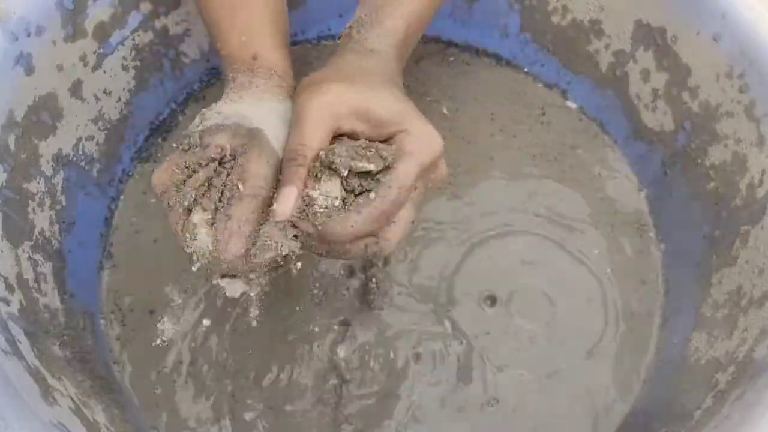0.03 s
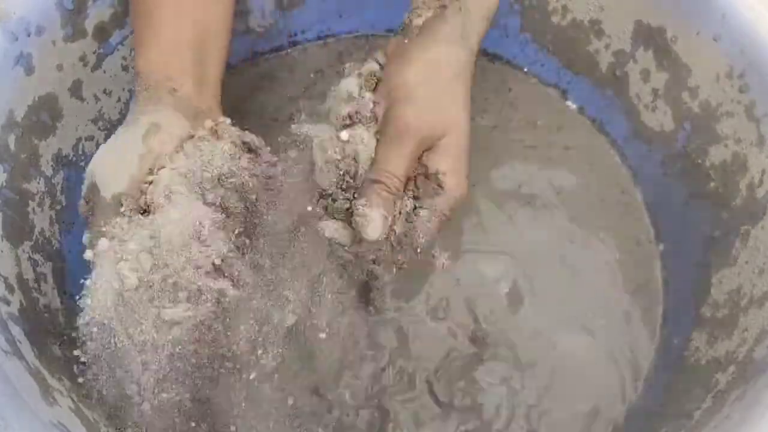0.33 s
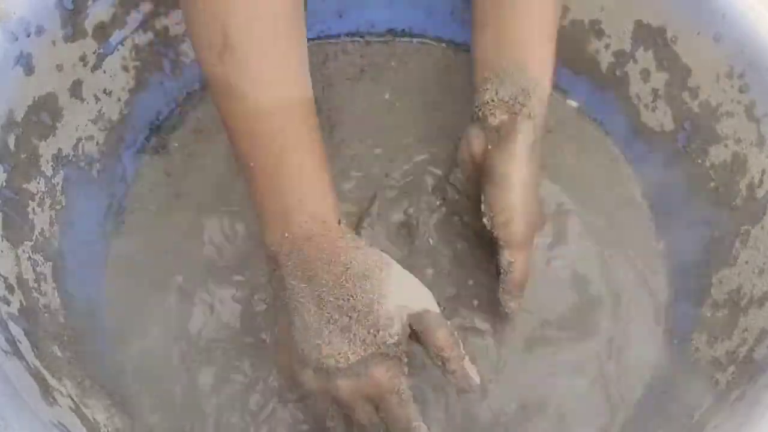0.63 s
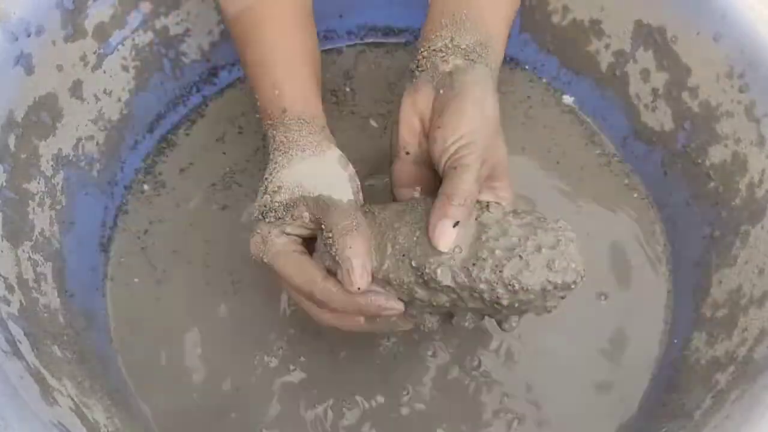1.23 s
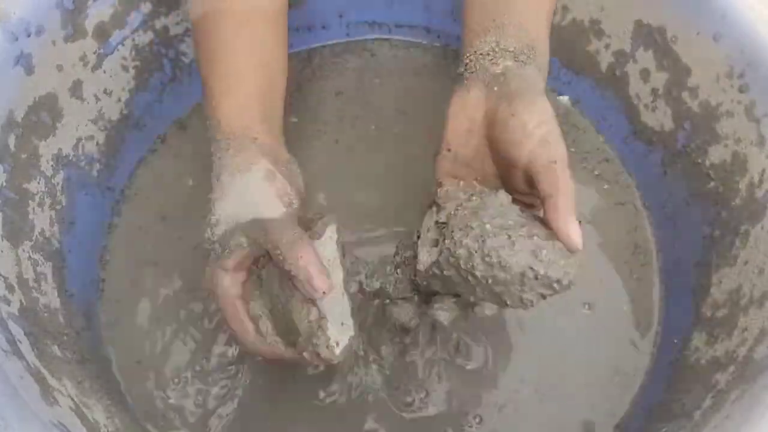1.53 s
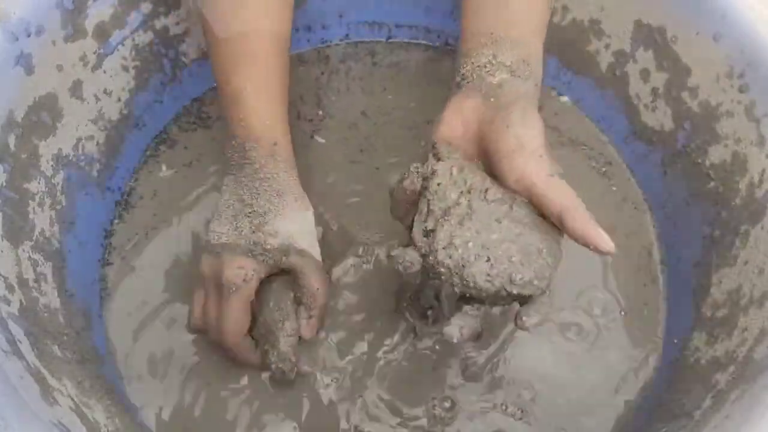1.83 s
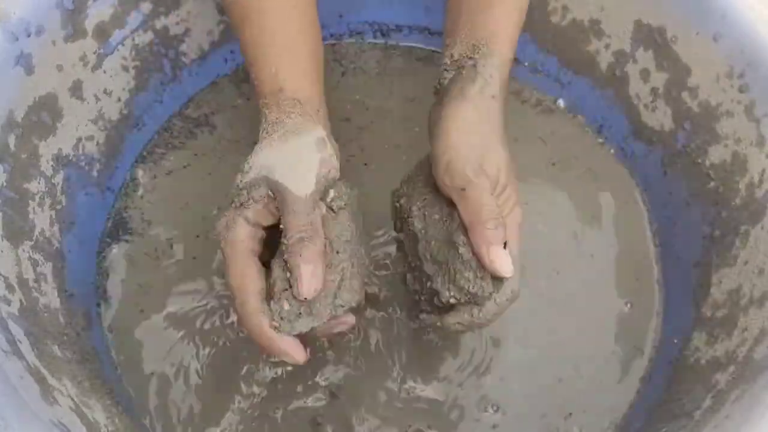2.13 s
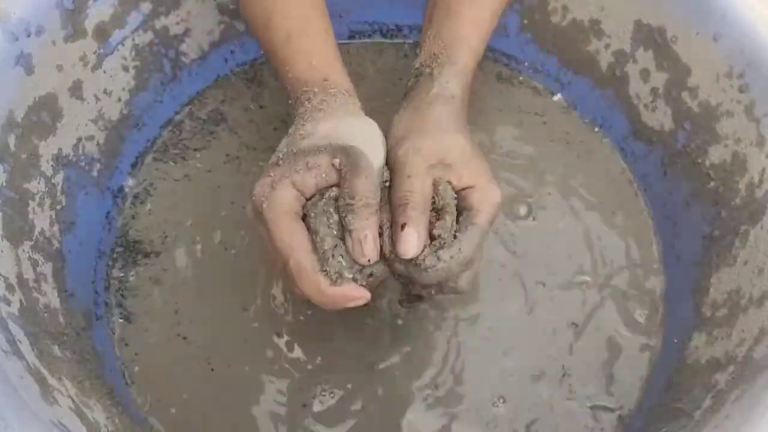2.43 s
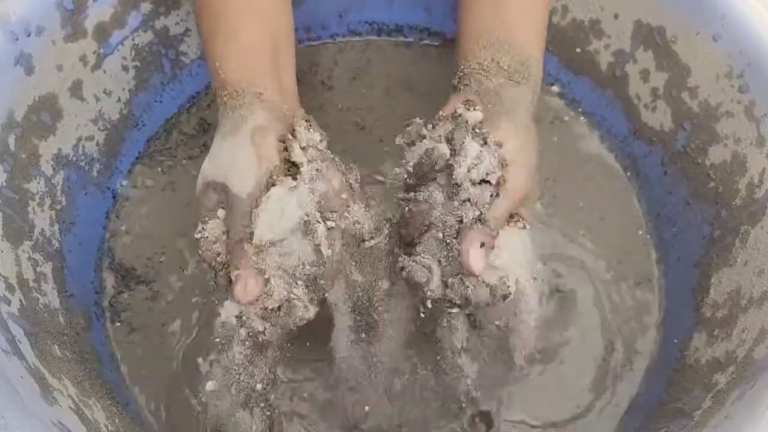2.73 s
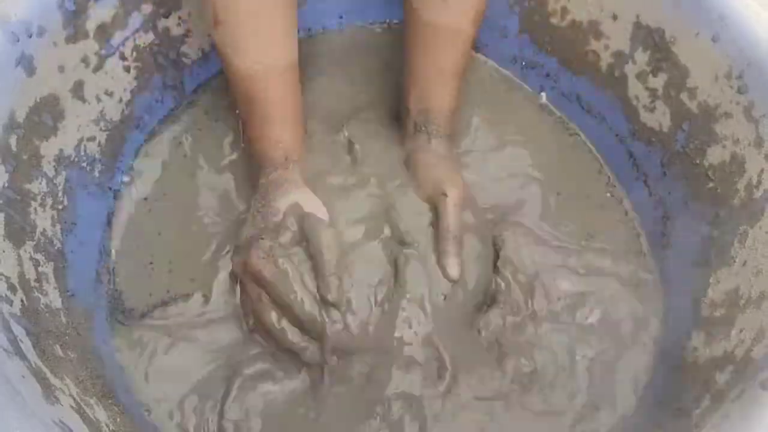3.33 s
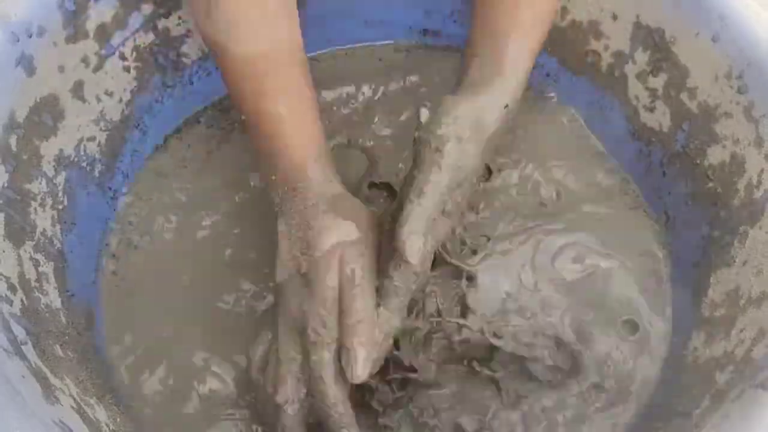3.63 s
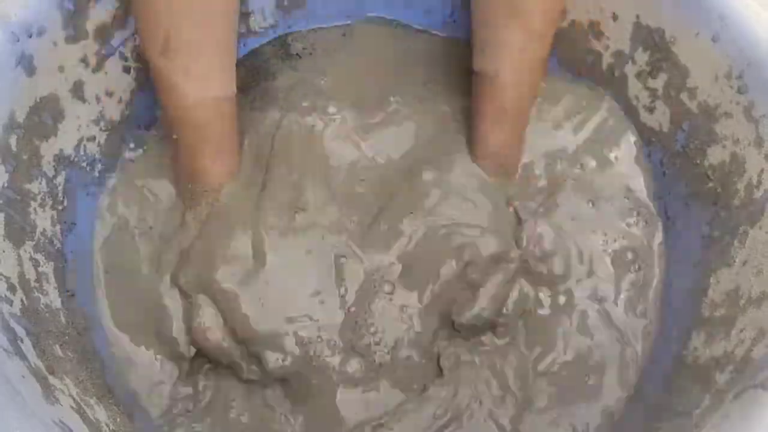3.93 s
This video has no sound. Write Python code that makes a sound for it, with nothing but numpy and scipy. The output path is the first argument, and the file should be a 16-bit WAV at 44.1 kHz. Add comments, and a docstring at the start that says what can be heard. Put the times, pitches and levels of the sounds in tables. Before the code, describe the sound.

Gritty lumps crumble and patter into muddy water, followed by wet squelching and sloshing.

```python
"""Grit crackles and patters onto muddy water, close up: two hands are crumbling lumps of sand and cement
over a plastic tub. A soaked lump is lifted, drips, snaps and is crushed; then the hands plunge and slosh.
The crackle is sand breaking loose in tiny bursts, and wet crumbs smack the surface.
Trapped air rings as short bubbles that rise in pitch. A low rumble lies underneath."""
import sys
import numpy as np
from scipy import signal
from scipy.fft import rfft, irfft
from scipy.io import wavfile

SR = 44100
rng = np.random.default_rng(int(sys.argv[2]) if len(sys.argv) > 2 else 0)


def bounce(signal):
    """Save signal as a 16-bit WAV file at the path given by the first command-line argument."""
    frames = np.transpose(np.atleast_2d(signal))
    limited = np.clip(frames, -1, 1)
    pcm = np.round(limited * 32767).astype(np.int16)
    wavfile.write(sys.argv[1], SR, pcm)


N = 176400
TOP_HZ = 15500


def undb(db):
    """Decibels to gain."""
    return 10 ** (np.asarray(db) / 20)


def unit(x):
    """Scale to rms 1."""
    return x / np.sqrt(np.mean(x ** 2))


def fade(t, t60):
    """Exponential decay by 60 dB in t60."""
    return np.exp(-np.log(1000) * t / t60)


def add(out, start_s, sound):
    """Drop a short sound onto the track."""
    i = int(np.clip(start_s * SR, 0, N - 1))
    out[i:i + len(sound)] += sound[:N - i]


def band(x, lo_hz, hi_hz, order=1):
    """Causal band-pass."""
    edges = [lo_hz, min(hi_hz, SR / 2 - 1000)]
    return signal.sosfilt(signal.butter(order, edges, "bandpass", fs=SR, output="sos"), x)


def equalise(x, curve, size=8192):
    """Minimum-phase EQ through (freq_hz, gain_db) points."""
    hz, db = np.array(curve).T
    bins_hz = np.arange(size // 2 + 1) * SR / size
    gain = undb(np.interp(np.log(bins_hz + 1), np.log(hz), db))
    cepstrum = irfft(np.log(gain))
    cepstrum[1:size // 2] *= 2
    cepstrum[size // 2 + 1:] = 0
    impulse = irfft(np.exp(rfft(cepstrum)))
    return signal.fftconvolve(x, impulse)[:len(x)]


def bubble(hz, ring_s, rise=0.15, attack_cycles=0.31):
    """A pocket of air speaks within a cycle, then bends up in pitch as it dies away."""
    t = np.arange(int(ring_s * SR) + 8) / SR
    envelope = (1 - np.exp(-t * hz / attack_cycles)) * fade(t, ring_s)
    return envelope / envelope.max() * np.sin(2 * np.pi * hz * t * (1 + rise * t / ring_s / 2))


def sizes(chance, spread_db):
    """Gains for many small grains and a few large ones, from uniform chance."""
    return undb(spread_db * np.minimum(-np.log(1 - chance), 4))


def swarm(flow, per_s, centre_hz, octaves, cycles, spread_db, busy_db=-33):
    """A cloud of tiny rings around one pitch; its level rides the flow, and it thins below busy_db."""
    out = np.zeros(N)
    density = np.minimum(flow / undb(busy_db), 1) ** 0.55
    grain_rng = np.random.default_rng(rng.integers(2 ** 31))
    for when, a, b, length, size, chance in grain_rng.random((int(per_s * N / SR), 6)):
        share = density[int(when * N)]
        if chance < share:
            hz = min(centre_hz * 2 ** (octaves * (a + b - 1)), TOP_HZ)
            ring_s = cycles * 2 ** (2 * length - 1) / hz
            gain = sizes(size, spread_db) / np.sqrt(share)  # thinning alone costs no power
            add(out, when * N / SR, np.sign(a - b) * gain * bubble(hz, ring_s))
    return unit(out) * flow


# Fader moves for the handwork: a lump crumbles at the start, another from 2.4 s, the plunge near 3.7 s.
# time_s, grit_db, patter_db, slosh_db
HAND_FADERS = [ (0, -39.5, -40.5, -54), (.05, -36.5, -39.5, -46.5), (.13, -39, -40, -46),
               (.21, -37, -38, -48), (.35, -37, -39, -40.5), (.48, -39, -43.5, -40.5),
               (.57, -37, -36.5, -43), (0.671, -39.5, -35, -40), (0.716, -48.5, -45.5, -44),
               (.84, -55, -49, -39.5), (0.929, -55.5, -52, -52), (0.989, -45, -40.5, -40.5),
               (1.06, -50, -44.5, -48), (1.16, -39, -39, -40), (1.22, -45.5, -41.5, -47),
               (1.39, -57, -46, -47), (1.46, -41.5, -49.5, -38.5), (1.52, -53.5, -53, -54.5),
               (1.66, -47, -54, -47.5), (1.8, -44, -41.5, -50), (1.9, -50.5, -50, -51),
               (2.02, -52, -52, -50), (2.1, -48, -56, -55), (2.26, -56, -56, -49.5),
               (2.375, -48.5, -47, -45.5), (2.44, -40.5, -41, -42), (2.61, -39, -35, -36),
               (2.68, -38, -41.5, -45.5), (2.75, -40, -35.5, -40), (2.83, -36, -35.5, -35.5),
               (2.9, -38, -37.5, -43.5), (3.0, -37.5, -37.5, -37), (3.1, -35, -33.5, -40.5),
               (3.16, -33.5, -29, -33.5), (3.272, -34.5, -38.5, -28.5), (3.32, -44, -44, -45),
               (3.38, -40, -34.5, -41.5), (3.448, -53.5, -47, -39), (3.519, -38, -30.5, -37),
               (3.62, -28.5, -26.5, -34.5), (3.68, -26.5, -24, -20), (3.77, -29, -32.5, -36),
               (3.848, -28, -31, -29.5), (3.908, -38, -37, -35.5), (4.0, -42.5, -39, -37)]


def handwork(column):
    """How hard the hands drive one layer, as gain over time."""
    rows = np.array(HAND_FADERS)
    return undb(np.interp(np.arange(N) / SR, rows[:, 0], rows[:, column]))


# The bright, sandy tone of grit: freq_hz, gain_db
GRIT_EQ = [(1500, -15), (3000, 3), (5200, -5), (6700, -2.5), (8200, -3), (9400, -5.5), (10600, -3),
           (12500, -5), (15500, -5)]


def grit(trim_db=-0.5, wet_span_s=(3, 3.6), wet_cutoff_hz=9100):
    """Sand breaks loose in tiny bursts, with lone clicks and ticking mud films; under water it dulls."""
    flow = handwork(column=1)
    when, size, noise = rng.random(N), rng.random(N), rng.standard_normal(N)
    breaks = (when < 520 / SR) * sizes(size, spread_db=4.5)
    bursts = noise * signal.fftconvolve(breaks, fade(np.arange(SR // 50) / SR, t60=0.032))[:N]
    clicks = (rng.random(N) < 500 / SR) * np.sign(noise) * sizes(size, spread_db=1.0)
    ticks = swarm(flow, per_s=1200, centre_hz=5810, octaves=1.37, cycles=33, spread_db=5.5)
    crackle = (unit(bursts) + undb(-5.5) * unit(clicks)) * flow
    sand = equalise(crackle + undb(-5.5) * ticks, GRIT_EQ)
    sand *= np.std(flow * noise) / np.std(sand)  # back to the fader's level
    dull = signal.sosfilt(signal.butter(1, wet_cutoff_hz, fs=SR, output="sos"), sand)
    wet = np.interp(np.arange(N) / SR, wet_span_s, [0, 1])
    return undb(trim_db) * (sand + wet * (dull - sand))


def patter(pour_db=-12.5):
    """Crumbs rain on the water, each leaving a tiny bubble; the finest sand merges into a pour."""
    flow = handwork(column=2)
    drops = swarm(flow, per_s=1400, centre_hz=2200, octaves=0.94, cycles=22.0, spread_db=4.0)
    fine_sand = (rng.random(N) < 4000 / SR) * rng.standard_normal(N)
    pour = unit(band(fine_sand, 1530, 3200, order=2))
    return (drops + undb(pour_db) * pour * flow) / np.hypot(1, undb(pour_db))


def slosh(trim_db=-1.5):
    """Stirred mud folds in larger, well damped bubbles and a few low gulps."""
    flow = handwork(column=3)
    bubbles = swarm(flow, per_s=560, centre_hz=900, octaves=1.116, cycles=16.3, spread_db=3.0)
    gulps = swarm(flow, per_s=200, centre_hz=390, octaves=0.95, cycles=12.4, spread_db=2.5)
    return undb(trim_db) * (bubbles + undb(-8.5) * gulps)


# The dark tone of the surroundings: freq_hz, gain_db
RUMBLE_EQ = [(15, -23), (28, -0.5), (60, 0.5), (110, -0.5), (170, 1.5), (260, -1.5), (500, -9),
             (1200, -30.5), (15500, -35.5)]


def rumble(level_db=-43.5):
    """The surroundings lay a steady bed of low noise."""
    return undb(level_db) * unit(equalise(rng.standard_normal(N), RUMBLE_EQ))


# Brittle accents from cement and mud films, plus one soft rub of the hands at 1.46 s: start_s, level_db,
# ring_ms, centre_hz
SNAP_CUES = [ (0.0321, -12, 8.3, 4060), (0.345, -15, 13, 4000), (.622, -16, 11, 4000),
             (.699, -18, 10, 4230), (.897, -21.5, 7.5, 3950), (1.1687, -12, 7.7, 3970),
             (1.2294, -15, 6.1, 6800), (1.2425, -11.5, 13, 6440), (1.3398, -27, 7, 7000),
             (1.3712, -21, 7.5, 7500), (1.437, -19, 22, 9350), (1.463, -27, 46, 8500),
             (1.692, -14, 20, 4060), (1.812, -15, 13, 6030), (1.872, -18.5, 26, 7000),
             (1.955, -10.5, 17, 5040), (2.158, -16.5, 36, 8600), (2.337, -8.5, 31, 7840),
             (2.4114, -7, 4.1, 4000), (2.623, -18.5, 8.7, 8050), (2.729, -14, 9.1, 4500),
             (2.8177, -6.5, 7.2, 6340), (2.8317, -16, 6, 6560), (2.864, -15, 8.7, 7600),
             (3.024, -10, 18, 11100), (3.061, -11.5, 7.8, 6900), (3.075, -12, 6, 8500),
             (3.145, -13.5, 19, 7000), (3.1773, -9, 11, 7150), (3.243, -4, 10, 4380),
             (3.466, -11, 3.5, 10500), (3.661, -7.5, 8.2, 6500), (3.7498, 4, 6.9, 6700),
             (3.8688, -4.5, 22, 6400), (3.9208, -11, 9.4, 7200)]


def snaps(trim_db=-5, click_db=-2.5, edge_ratio=1.155):
    """Cement cracks and thin films of mud burst, and once the hands rub: a narrow, bright ring over a broad
    click."""
    out, t = np.zeros(N), np.arange(SR // 20) / SR
    for start_s, level_db, ring_ms, centre_hz in SNAP_CUES:
        burst = rng.standard_normal(len(t)) * fade(t, ring_ms / 1000)
        ring = band(burst, centre_hz / edge_ratio, centre_hz * edge_ratio)
        click = band(equalise(burst, GRIT_EQ), 900, 11300)
        crack = ring + undb(click_db) * click
        add(out, start_s, undb(level_db + trim_db) * crack / abs(crack).max())
    return out


# Wet crumbs and drops smacking the water: start_s, level_db, centre_hz, ring_ms
SPLAT_CUES = [ (0.0648, -23, 2520, 34), (0.188, -23.5, 2330, 78), (.251, -23, 2200, 8.9),
              (0.324, -19.5, 2120, 17), (.350, -18.5, 2440, 56), (.361, -19.5, 1400, 13),
              (.441, -23.5, 930, 56), (.528, -21, 1650, 52), (0.6504, -16.5, 1450, 18),
              (0.6734, -17, 1870, 12), (1.229, -20.5, 1660, 19), (1.303, -18, 1480, 24),
              (1.371, -23, 1220, 13), (1.396, -23.5, 1900, 20), (1.428, -27, 1180, 12),
              (1.44, -20, 2070, 19), (1.5915, -16.5, 2130, 20), (1.618, -29.5, 3000, 14),
              (1.802, -18.5, 1890, 16), (1.921, -21.5, 1330, 18), (2.1718, -22, 1970, 11),
              (2.3392, -16.5, 2600, 22), (2.4113, -11, 2200, 18), (2.4859, -18, 1380, 15),
              (2.508, -23, 1900, 11), (2.621, -18, 1300, 45), (2.838, -14.5, 1360, 16),
              (2.864, -18.5, 1080, 17), (2.938, -18, 900, 52), (2.968, -29, 1900, 14),
              (3.049, -17.5, 2200, 17), (3.169, -14, 1940, 33), (3.218, -13, 1340, 12),
              (3.245, -12.5, 1270, 9.8), (3.507, -14, 1600, 29), (3.658, -18, 1470, 51),
              (3.6897, -8.5, 1880, 13), (3.746, -11, 1400, 28), (3.803, -11, 1260, 27),
              (3.845, -9, 1580, 9), (3.8695, -13.5, 2300, 29)]


def splats(trim_db=3.5, strike_db=14, edge_ratio=1.285):
    """Each smack is a sharp strike and a short spatter that ring in the dent made in the water."""
    out, t = np.zeros(N), np.arange(SR // 20) / SR
    strike = undb(strike_db) * (t == 0)
    for start_s, level_db, centre_hz, ring_ms in SPLAT_CUES:
        spatter = rng.standard_normal(len(t)) * fade(t, ring_ms / 1000)
        dent = band(strike + spatter, centre_hz / edge_ratio, centre_hz * edge_ratio)
        smack = band(dent, 260, 3200)
        add(out, start_s, undb(level_db + trim_db) * smack / abs(smack).max())
    return out


# Foreground bubbles: start_s, pitch_hz, level_db, ring_ms
PLOP_CUES = [ (0.349, 299, -17.5, 36), (0.4403, 326, -18.5, 22), (0.573, 1480, -13, 9.7),
             (0.6539, 1035, -18, 35), (0.6648, 785, -13, 6.2), (0.6667, 490, -16, 12),
             (0.717, 1026, -22, 34), (0.983, 920, -20.5, 41), (1.0228, 1230, -10, 14.5),
             (1.029, 288, -16.5, 53), (1.179, 3760, -23, 13), (1.244, 544, -7.5, 25),
             (1.3018, 1010, -14.5, 23), (1.316, 1460, -21.5, 25), (1.340, 950, -16, 11.5),
             (1.3425, 565, -19.5, 28), (1.3712, 652, -18.5, 33), (1.396, 585, -19, 35),
             (1.509, 1040, -26, 38), (1.6434, 1054, -21.5, 27), (1.647, 1350, -18.5, 22),
             (1.694, 994, -16.5, 34), (1.6985, 1320, -17.5, 26), (1.711, 1390, -24, 21),
             (1.8494, 1530, -13, 18.4), (1.875, 1050, -19.5, 34), (1.968, 574, -19.5, 32),
             (2.027, 3250, -23, 12.3), (2.123, 1224, -24.5, 20), (2.1583, 280, -8.5, 21.8),
             (2.1587, 640, -16, 33), (2.2138, 1090, -8.5, 5.8), (2.2154, 773, -10, 38),
             (2.2221, 900, -19, 36), (2.295, 3100, -18.5, 6.1), (2.313, 1320, -26, 12),
             (2.337, 283, -2.5, 9.6), (2.392, 1160, -13, 12), (2.4114, 1790, -13, 7.9),
             (2.4134, 900, -10.5, 10.3), (2.4432, 715, -20, 20), (2.5871, 2340, -12.5, 11),
             (2.7573, 673, -18.5, 22), (2.764, 1060, -16.5, 20), (2.8008, 1325, -13.5, 25),
             (2.8314, 1070, -9, 7.4), (3.1266, 696, -13.5, 10.4), (3.1478, 1020, -15, 22),
             (3.215, 950, -12, 10), (3.2429, 1026, -12.5, 26), (3.2746, 1430, -10, 19),
             (3.294, 1020, -9.5, 28), (3.513, 1027, -9.5, 42), (3.514, 1380, -7.5, 14),
             (3.5292, 2060, -12, 23), (3.5712, 636, -13.5, 37), (3.5737, 750, -8.5, 33),
             (3.6071, 1070, -7.5, 20), (3.6333, 630, -9, 22), (3.6531, 970, -7.5, 20),
             (3.6824, 600, -4, 15.4), (3.685, 347, -17.5, 73), (3.7297, 2250, -7.5, 14),
             (3.748, 980, -6, 5.6), (3.7756, 640, -13, 57), (3.7895, 1467, -3, 3),
             (3.8399, 1520, -6.5, 13.4)]


def plops(trim_db=-1.5, wobble_depth=0.18, contact_db=-10, split_db=-12.5, split_within_s=0.008):
    """The surface clicks on contact, a large bubble wobbles as it rings, and a smaller one splits off."""
    out = np.zeros(N)
    for start_s, pitch_hz, level_db, ring_ms in PLOP_CUES:
        noise = rng.standard_normal(SR // 10)
        lag, interval, hardness = rng.random(3)
        gain = undb(level_db + trim_db)
        ring = bubble(pitch_hz, ring_ms / 1000)
        wobble = unit(band(noise, pitch_hz / 20, pitch_hz / 2, order=2))[-len(ring):]
        click = equalise(noise * fade(np.arange(len(noise)) / SR, t60=0.0061), GRIT_EQ)
        offshoot = bubble(pitch_hz * 2 ** (.5 + interval / 2), ring_ms / 1000 / 2)
        add(out, start_s, -gain * ring * (1 + wobble_depth * wobble))
        add(out, start_s, gain * hardness * undb(contact_db) * click / abs(click).max())
        add(out, start_s + lag * split_within_s, gain * undb(split_db) * offshoot)
    return out


def tub(x, wall_s=0.0034, wall_db=-20, tail_db=-22.5):
    """One quick slap off the tub wall and a faint, short tail."""
    t = np.arange(SR // 3) / SR
    impulse = band(rng.standard_normal(len(t)) * fade(t, t60=0.056) * (t > wall_s), 130, 7700)
    tail = signal.fftconvolve(x, impulse / np.linalg.norm(impulse))[:N]
    slap = np.interp(np.arange(N) - wall_s * SR, np.arange(N), band(x, 430, 6100), left=0)
    return x + undb(wall_db) * slap + undb(tail_db) * tail


def scene():
    """Textures and accents sound in the tub, over the rumble; mono."""
    bed = rumble()
    textures = grit() + patter() + slosh()
    accents = plops() + splats() + snaps()
    return (tub(textures + accents) + bed)[None]


def record(dry):
    """A steep high cut on the whole mix."""
    return signal.sosfilt(signal.ellip(10, .2, 80, TOP_HZ, fs=SR, output="sos"), dry)


dry = scene()
out = record(dry)
bounce(out)
```